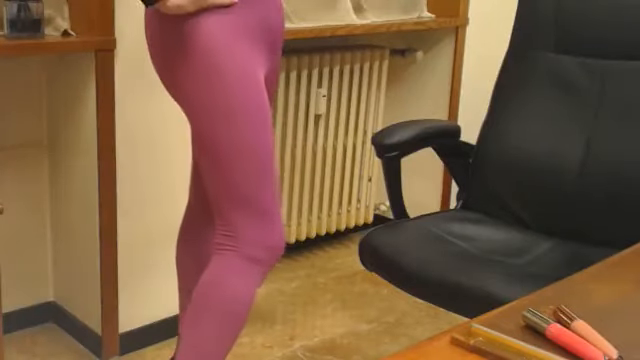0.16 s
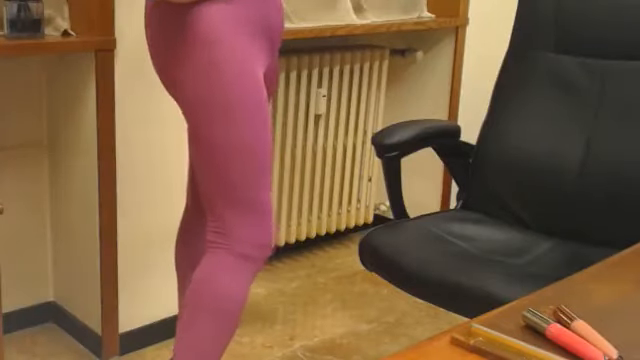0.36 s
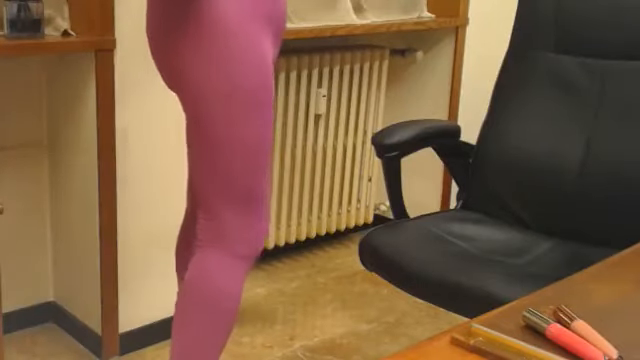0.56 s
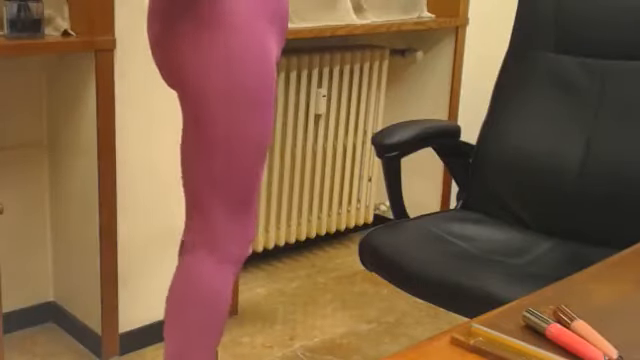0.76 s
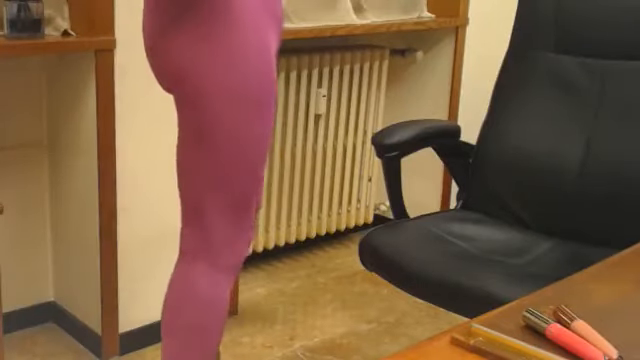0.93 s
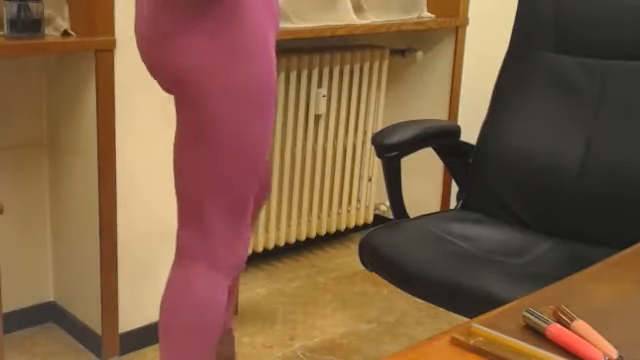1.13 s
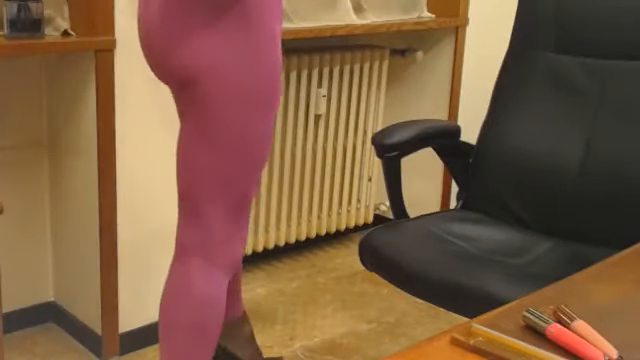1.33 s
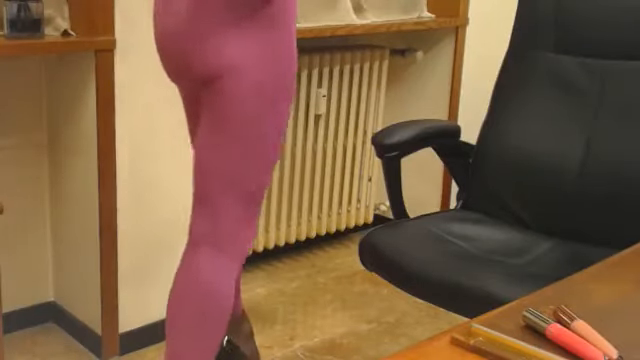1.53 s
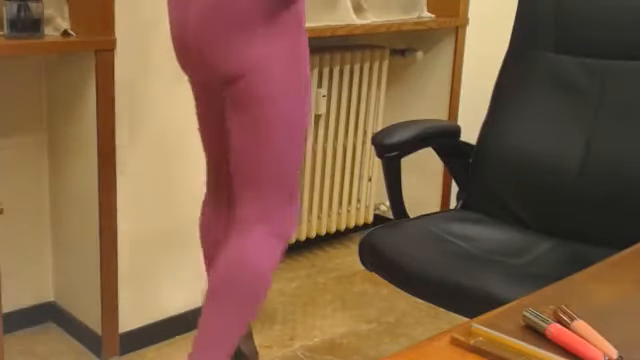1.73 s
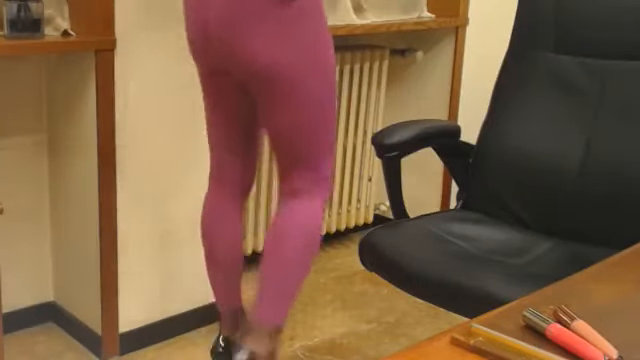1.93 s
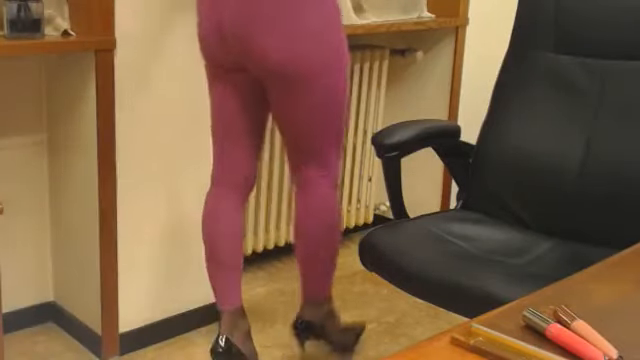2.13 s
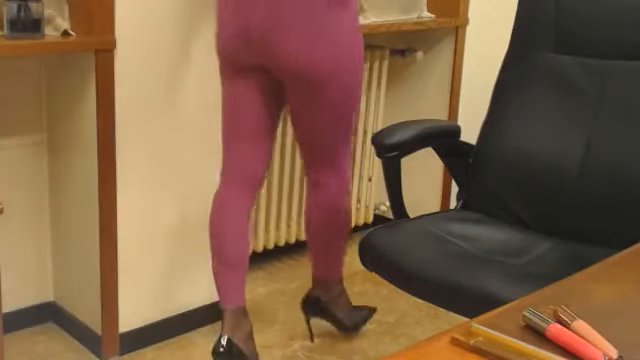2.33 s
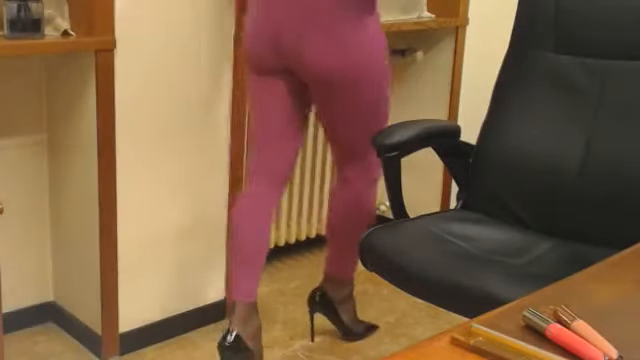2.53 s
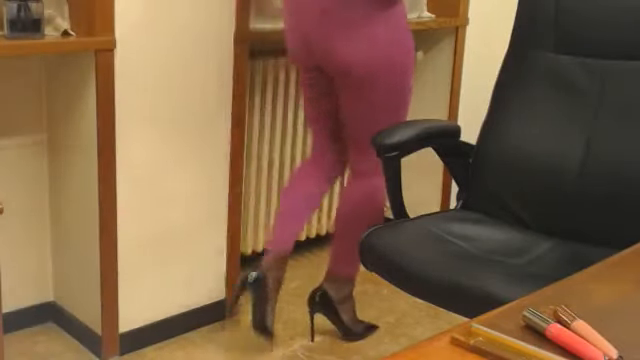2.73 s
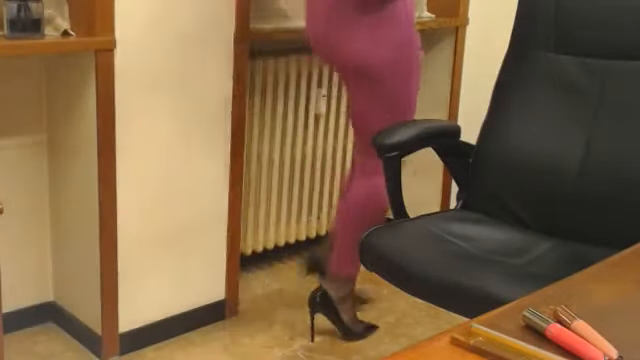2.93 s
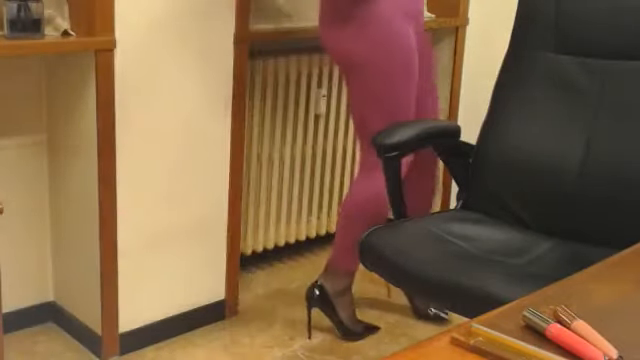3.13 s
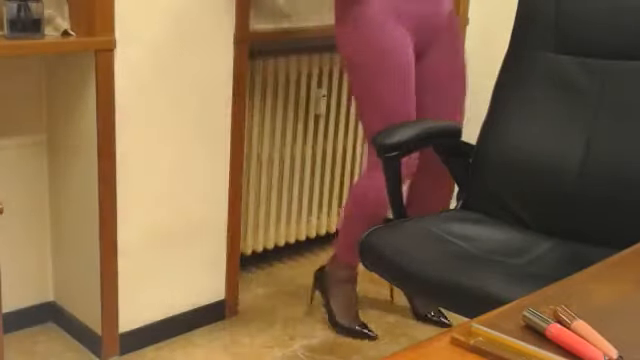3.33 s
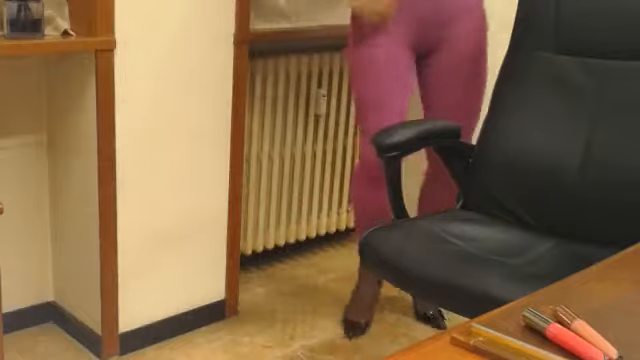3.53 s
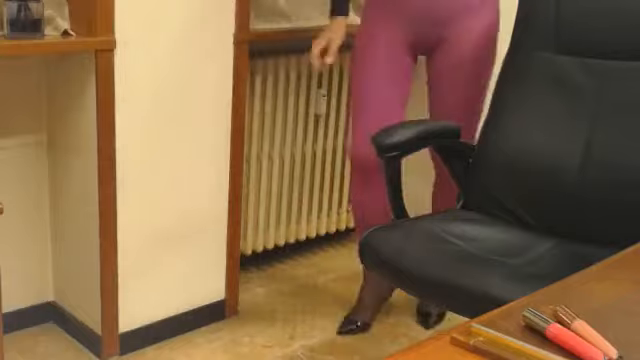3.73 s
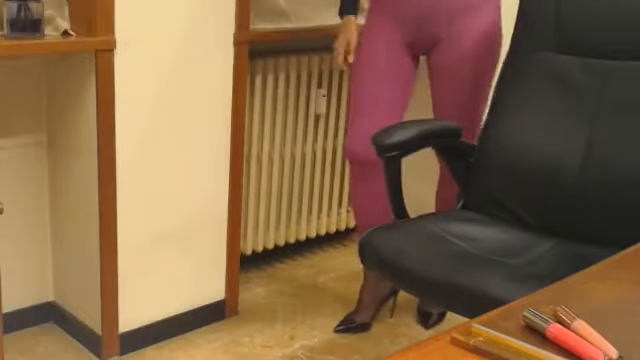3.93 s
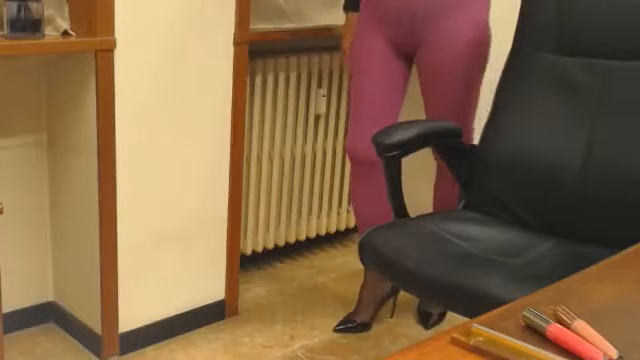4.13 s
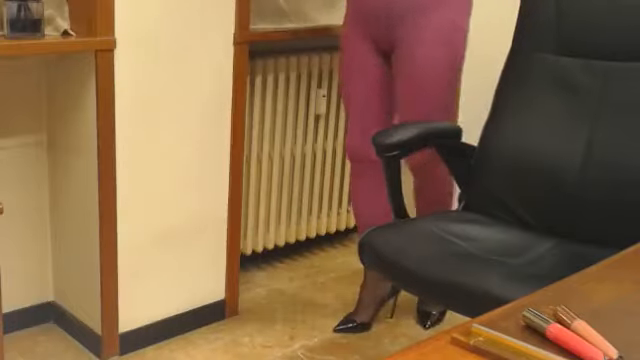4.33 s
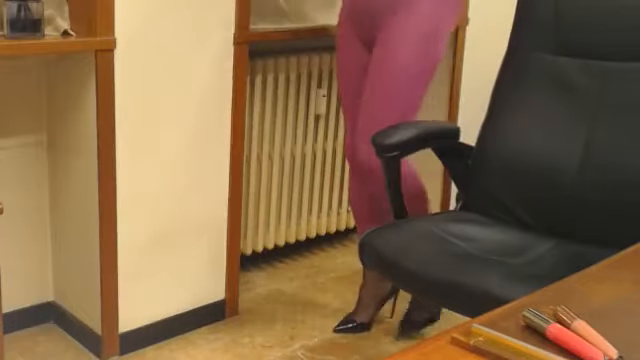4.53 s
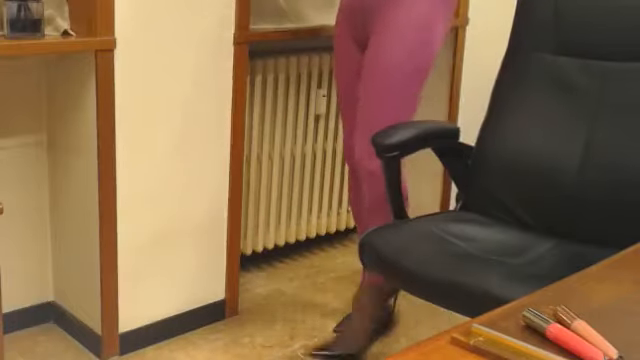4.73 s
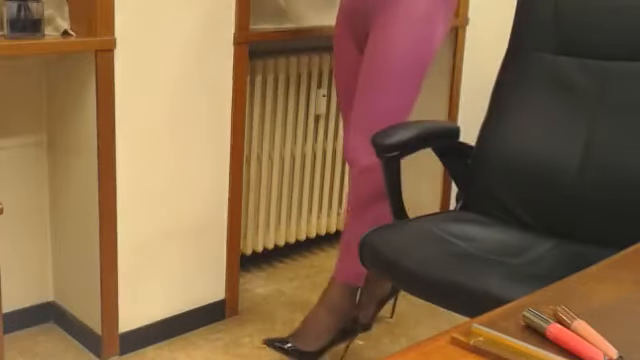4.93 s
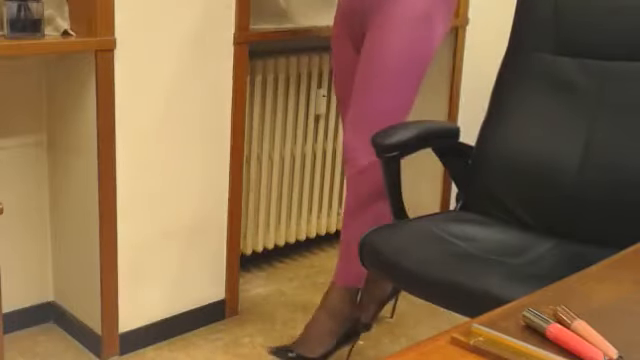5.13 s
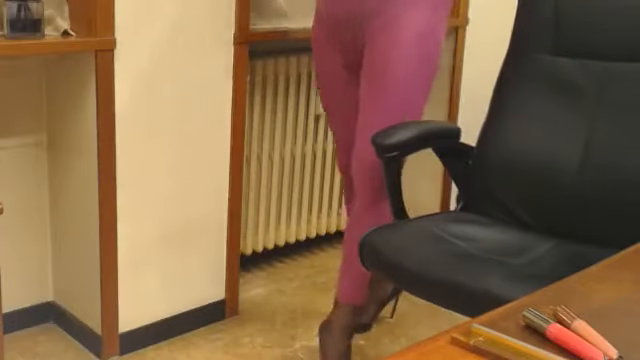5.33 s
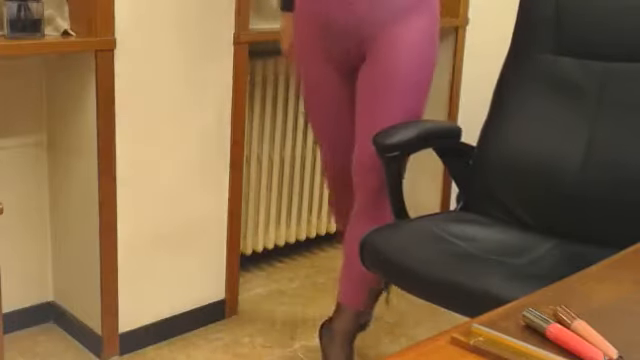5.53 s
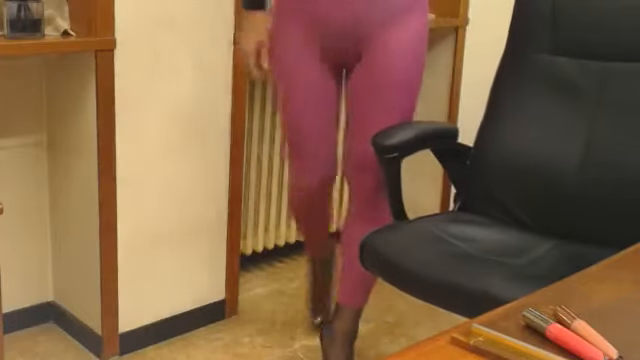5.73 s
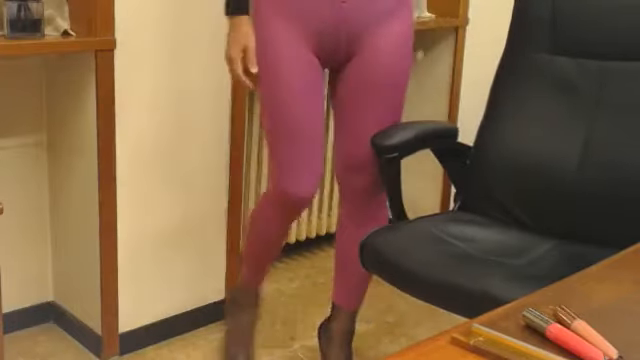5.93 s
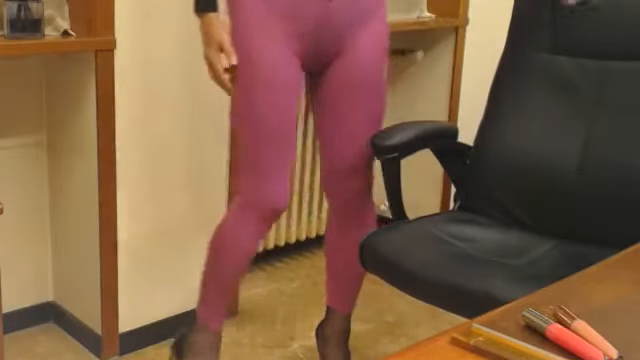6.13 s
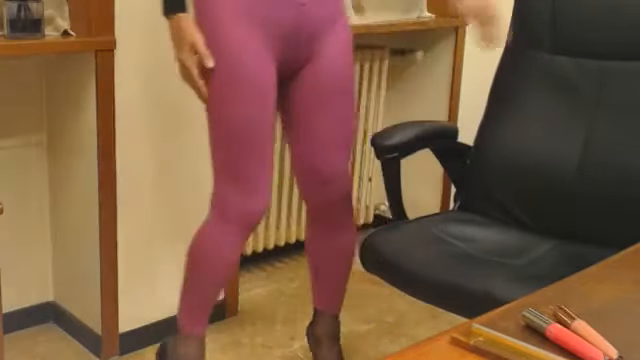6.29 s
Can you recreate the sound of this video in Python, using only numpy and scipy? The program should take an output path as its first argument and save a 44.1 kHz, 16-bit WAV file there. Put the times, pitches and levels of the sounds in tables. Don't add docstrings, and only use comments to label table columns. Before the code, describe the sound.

A faint low ventilation hum and a small cloth rustle open in a small office. High heels then knock firmly on the hard floor, clustering into loud double clacks with gritty sole scrapes. Lighter steps follow, then a pause, one hard stamp, and soft scuffing steps to the end. Heard in stereo from a metre or two away, with short close room reflections.

```python
import sys
import numpy as np
from scipy import signal
from scipy.fft import rfft, irfft
from scipy.io import wavfile
from scipy.ndimage import uniform_filter1d

SR = 44100
rng = np.random.default_rng(int(sys.argv[2]) if len(sys.argv) > 2 else 0)


def invert_db(level):
    return 10 ** (np.asarray(level, dtype=float) / 20)


def output_pcm(signal):
    pcm = np.clip(np.atleast_2d(signal).T, -1, 1) * 32767
    wavfile.write(sys.argv[1], SR, np.round(pcm).astype(np.int16))


N = 280476

# f/Hz, density/dB per Hz
AIR_SPECTRUM = [(22, -2.5), (45, -18.5), (90, -4), (170, -13.5), (340, -9), (600, -13.5), (950, -15),
                (1300, -21), (2200, -28), (4000, -35.5), (7000, -43), (9000, -39.5), (11500, -53),
                (15500, -53)]
# f/Hz, width/Hz, level/dB
DUCT_HUM = [
    (34.4, 25.3, -53),
    (130.5, 12.9, -53.5),
    (208, 85, -55.5),
    (289.4, 39.4, -54.5),
]
# t/s, rumble swell/dB
SWAYS = [
    (.96, 5),
    (1.47, 21),
    (1.84, 6),
    (2.2, 22),
    (2.44, 19.5),
    (3.47, 3.5),
    (4.96, 14),
    (5.38, 5.5),
    (6.13, 9),
    (6.32, 12.5),
]
# t/s, level/dB
MOTION = [(0, -1), (1.25, 0), (1.65, 3.5), (2.05, -4.5), (2.5, 3.5), (2.9, -.5), (3.45, 3), (3.85, 0.5),
          (5.0, -2), (5.4, 0), (6.36, 1.5)]
# peak t/s, rise/s, fall/s, peak level/dB, brightness/dB per range
SWISHES = [(.368, 0.055, 0.062, -54.5, 3.5), (1.592, 0.035, .07, -67, 8), (1.85, .015, 0.13, -59.5, -0.5),
           (2.525, 0.033, 0.13, -66.5, 1), (2.74, .08, 0.035, -71, 6.5), (3.42, 0.38, 0.32, -68, 7.5),
           (3.62, 0.36, 0.47, -66.5, -6.5), (3.95, 0.53, 0.26, -73.5, 10.5), (5.57, .1, 0.063, -71, 5.5),
           (5.77, 0.093, 0.17, -63.5, -1.5), (6.0, .15, .2, -71, 12), (6.12, 0.16, 0.11, -63.5, -7),
           (3.25, .06, 0.087, -84.5, 3.5)]
CLOTH_DB = [-8, -4, 0.5, -8]
# peak t/s, rise/s, fall/s, peak level/dB, brightness/dB per range
SCRAPES = [(.44, 0.037, 0.037, -47.5, 0), (.98, 0.035, 0.069, -64, 10), (1.605, 0.042, 0.12, -46, -1.5),
           (2.088, 0.0087, 0.034, -34, -1), (2.11, .02, 0.13, -49.5, 2), (2.16, 0.053, 0.12, -42, 1.5),
           (2.522, 0.032, 0.044, -43, 3.5), (2.754, .025, .04, -60, -12), (2.55, 0.048, 0.081, -49.5, 4),
           (5.245, 0.013, 0.11, -42, 4), (3.3, 0.014, 0.09, -48.5, -12), (3.79, .02, 0.043, -41.5, -15),
           (3.845, 0.025, .06, -51.5, -3), (4.02, .018, 0.063, -39, -10), (5.475, 0.059, 0.038, -50, -2),
           (5.934, .12, 0.23, -57.5, 6.5), (6.295, .03, 0.2, -48.5, 3.5)]
SOLE_DB = [-1.5, -13, -25.5, -39.5]
# peak t/s, rise/s, fall/s, peak level/dB, brightness/dB per range
RASPS = [(2.09, 0.014, .04, -41, 2), (3.235, 0.033, 0.12, -45.5, 1.5), (3.285, 0.024, 0.03, -65, 0),
         (5.372, 0.035, 0.034, -52, 5), (5.46, .07, 0.098, -49, 4.5), (5.912, .018, .06, -54, 1.5),
         (1.445, 0.011, 0.11, -50.5, -1)]
LEATHER_DB = [-1.5, -3, -19.5, -41]
# t/s, peak level/dB, knock f/Hz, thump/dB re knock, rebound/dB re landing
LANDINGS = [(.429, -35, 545, -31, -.5), (1.432, -18, 656, -3, 5), (1.435, -16.5, 364, -29, -31),
            (1.625, -20, 360, -6.5, -7.5), (2.13, -15.5, 645, -0.5, -16), (2.142, -13, 279, -30, -7),
            (2.397, -15, 402, -11, -1.5), (2.503, -30, 645, -23, 3), (3.273, -17.5, 467, -26, 0),
            (3.781, -21, 423, -33, -0.5), (3.782, -20, 674, -38, -6), (4.009, -28.5, 883, -13, -8),
            (5.24, -11, 514, -9, -2.5), (5.761, -41, 595, -10, -12), (5.902, -36.5, 455, -19, -3),
            (6.109, -43, 418, 1.5, 5), (6.287, -28, 490, -4.5, 6.5)]
# t/s, peak level/dB, knock f/Hz, thump/dB re knock
TOUCHES = [(1.481, -34.5, 405, 4), (1.532, -33.5, 463, -8), (1.643, -24, 277, -9), (1.665, -33, 550, -26),
           (2.089, -26.5, 970, -27), (2.092, -21, 563, -14), (2.163, -12.5, 356, 2), (2.161, -21, 954, -30),
           (2.19, -19, 718, -10), (2.213, -23.5, 287, 1.5), (2.266, -29.5, 308, -2.5),
           (2.423, -22.5, 638, -1), (2.445, -20, 503, -7), (2.52, -24, 806, -14), (3.302, -40, 530, -23),
           (3.322, -30, 550, -23), (3.811, -19, 694, -14), (3.832, -26, 740, -30), (4.044, -46.5, 945, 7.5),
           (3.845, -32, 755, -33), (5.274, -18.5, 380, -24), (5.293, -25.5, 566, -1.5),
           (5.308, -33, 468, -1), (5.374, -38, 380, 3.5), (6.134, -36, 285, -3), (6.306, -24, 537, -32),
           (2.146, -21, 700, -20), (2.551, -45, 880, -23), (1.43, -25, 520, -23), (2.472, -25, 487, -6)]
# t/s, peak level/dB, f/Hz, crack/dB re tick
TICKS = [(1.433, -33, 1700, -12.5), (1.446, -29, 965, -21), (1.592, -42, 834, -10.5), (1.844, -47, 3020, 1),
         (2.078, -34.5, 3780, -23), (2.091, -28.5, 1260, -34.5), (2.090, -31.5, 2420, -29.5),
         (2.132, -41.5, 1810, -5.5), (2.401, -39, 1190, -28), (2.397, -51, 2180, 3),
         (2.523, -53, 3030, -5.5), (2.724, -61.5, 1500, -10.5), (3.218, -37, 2080, -29),
         (5.475, -45, 1260, -26), (3.275, -37, 1480, -24), (3.276, -45, 2720, -19.5),
         (3.782, -40, 1550, -17.5), (4.010, -44, 1740, -7.5), (5.241, -46.5, 1310, -32),
         (5.242, -61.5, 2680, 7), (5.902, -46.5, 1900, -20), (6.106, -63, 1100, -16),
         (6.286, -45.5, 1830, -4.5)]
# lag/s, level/dB
WALL_ECHOES = [
    (.0055, -5),
    (0.023, -29.5),
    (.04, -8.5),
]
# f/Hz, shared power/0..1
LIKENESS = [(60, 1), (300, 0.98), (800, 0.94), (2000, 0.58), (5000, 0.64), (12000, 0.36)]
# t/s, length/s
DROPOUTS = [(.026, .07), (.705, .032), (.993, .045), (1.304, .064), (2.011, .064), (2.753, .041),
            (2.84, .042), (2.97, .047), (3.178, .2), (3.444, .057), (4.162, .071), (4.375, .066),
            (4.609, .046), (4.717, .1), (5.106, .046), (5.64, .047), (5.729, .041), (5.82, .048)]

SWAY_S = 0.11
SWELL_DB, SWELL_ROUND = 21, 1.49
LANDING_TAIL_S, REBOUND_TAIL_S, TOUCH_TAIL_S, TICK_TAIL_S = 0.14, 0.054, 0.057, 0.11
REBOUND_S, REBOUND_HZ = .0125, 530
THUMP_HZ = 203
ROOM_T60_S, ROOM_DB, ROOM_PER_DB = 0.4, -12, -0.1939
TICK_T60_S, TICK_T60_PER_DB = 0.12, -0.13
GATE_SOFT_S, ECHO_SCATTER_DB, ECHO_SCATTER_S = .011, 2.0, .0008
TAIL_N = 8192
PORT_LAG_N = 4


def at_hz(points, hz):
    point_hz, value = np.transpose(points)
    return np.interp(np.log(hz), np.log(point_hz), value)


def rms_one(x):
    return x / np.sqrt(np.mean(x ** 2) + 1e-20)


def drift(rate):
    r = np.exp(-80 * np.pi * rate / SR)
    slow = signal.lfilter([1], [1, -2 * r, r * r], rng.standard_normal(N // 40 + 2002))
    slow = slow[2000:]
    return np.interp(np.arange(N) / 40, np.arange(len(slow)), rms_one(slow))


def resonance(x, hz, width_hz):
    r = np.exp(-np.pi * width_hz / SR)
    zeros = np.array([1, 0, -1]) * (1 - r * r) / 2
    poles = [1, -2 * r * np.cos(2 * np.pi * hz / SR), r * r]
    return signal.lfilter(zeros, poles, x)


def band(x, low_hz, high_hz):
    return signal.sosfilt(signal.butter(2, [low_hz, high_hz], "band", fs=SR, output="sos"), x)


def ports(mid, side):
    size = mid.shape[-1]
    alike = np.clip(at_hz(LIKENESS, np.fft.rfftfreq(size, 1 / SR) + 1), 0, 1)
    shared = np.sqrt(alike) * rfft(mid)
    own = np.sqrt(1 - alike) * rfft(side)
    return irfft(np.array([shared + own, shared - own]), size)


def air():
    t = np.arange(N) / SR
    white = rng.standard_normal((2, 2, N))
    breath_db = .7 * drift(3)
    rumble_db = sum(db * np.clip(1 - np.abs(t - s) / SWAY_S, 0, 1) for s, db in SWAYS) - 2.5
    rustle_db = np.interp(t, *np.transpose(MOTION))
    edges_hz = 22 * 2 ** np.arange(0, 9.7, 1 / 3)
    out = 0
    for k, (low_hz, high_hz) in enumerate(zip(edges_hz, edges_hz[1:])):
        level_db = at_hz(AIR_SPECTRUM, np.sqrt(low_hz * high_hz)) + breath_db + 1.3 * drift(9.2)
        level_db = level_db + rumble_db * (high_hz < 130)
        level_db = level_db + rustle_db * np.clip(np.log2(low_hz / 600) / 2, 0, 1)
        out = out + invert_db(level_db) * band(white[k % 2], low_hz, high_hz)
    out = invert_db(-48.5) * rms_one(out)
    for hz, width_hz, db in DUCT_HUM:
        hum = resonance(rng.standard_normal((2, N)), hz, width_hz)
        hum = resonance(hum, hz, 2 * width_hz)
        out = out + invert_db(db) * rms_one(hum)
    return ports(*out)


def stroke_gains(strokes, colour_db, pivot):
    t = np.arange(N) / SR
    gains = np.zeros((4, N))
    for s, rise_s, fall_s, db, bright_db in strokes:
        away = np.maximum((s - t) / rise_s, (t - s) / fall_s)
        on = away < 1.5
        tilt_db = np.array(colour_db) + bright_db * (np.arange(4) - pivot)
        gains[:, on] += invert_db(tilt_db)[:, None] * invert_db(db - SWELL_DB * away[on] ** SWELL_ROUND)
    return gains


def scuffs():
    sizes = invert_db(np.minimum(rng.exponential(1, (2, N)), 5)) * rng.standard_normal((2, N))
    grains = sizes * (rng.random((2, N)) < 6000 / SR)
    gains = stroke_gains(SWISHES, CLOTH_DB, 2)
    gains += stroke_gains(SCRAPES, SOLE_DB, 0)
    gains += stroke_gains(RASPS, LEATHER_DB, 1)
    ranges_hz = [(750, 1240), (1350, 3320), (3500, 6960), (8000, 11000)]
    out = 0
    for gain, (low_hz, high_hz) in zip(gains, ranges_hz):
        friction = rms_one(band(band(grains, low_hz, high_hz), low_hz, high_hz))
        out = out + gain * invert_db(0.5 * drift(37)) * friction
    return ports(*out)


def reflections(t60_s, room_db, swell_s, gate_s):
    t = np.arange(TAIL_N) / SR
    decay = invert_db(room_db - 60 * t / max(t60_s, .03))
    swarm = rng.standard_normal((2, TAIL_N)) * (1 - np.exp(-t / swell_s)) * decay
    swarm[:, 0] = [1, .3]
    for lag_s, db in WALL_ECHOES:
        wobble = rng.standard_normal(2)
        at = round((lag_s + ECHO_SCATTER_S * wobble[0]) * SR)
        swarm[:, at] += invert_db(db + ECHO_SCATTER_DB * wobble[1]) * np.sign(wobble)
    return swarm / (1 + np.exp(np.clip((t - gate_s) / GATE_SOFT_S, -30, 30)))


def struck(echoes, hz, sharpness):
    body = np.r_[1, np.zeros(2047)]
    for spread in (1.0, 1.6, 2.4):
        body = resonance(body, hz, spread * hz / sharpness)
    body = signal.sosfilt(signal.butter(4, 1.2 * hz, fs=SR, output="sos"), body)
    return signal.fftconvolve(echoes, [body / np.abs(body).max()])[:, :TAIL_N]


def add(out, s, sound):
    at = round(s * SR)
    out[:, at:at + TAIL_N] += ports(*sound)


def knock(out, s, db, hz, thump_db, gate_s):
    room_db = ROOM_DB + ROOM_PER_DB * (db + 25.5) - 19.0
    echoes = reflections(ROOM_T60_S, room_db, 0.0027, gate_s)
    shoe = struck(echoes, hz, 2.33 * (hz / 500) ** 0.5)
    floor = invert_db(thump_db - 2.0) * struck(echoes, THUMP_HZ, 1.78)
    add(out, s, invert_db(db) * (shoe + floor))


def tick(out, s, db, hz, crack_db):
    t60_s = TICK_T60_S * invert_db(TICK_T60_PER_DB * (db + 45))
    echoes = reflections(t60_s, -14.5, 0.00099, TICK_TAIL_S)
    crack = band(echoes, 2800, 8000) + invert_db(-29.5) * band(echoes, 5500, 11000)
    crack[:, :64] += invert_db(-14) * band(echoes[:, :64], 10500, 15500)
    add(out, s, invert_db(db) * (struck(echoes, hz, 2.5) + invert_db(crack_db + 11) * crack))


def steps():
    out = np.zeros((2, N + TAIL_N))
    for s, db, hz, thump_db, rebound_db in LANDINGS:
        knock(out, s, db, hz, thump_db, LANDING_TAIL_S)
        knock(out, s + REBOUND_S, db + rebound_db, REBOUND_HZ, thump_db, REBOUND_TAIL_S)
    for s, db, hz, thump_db in TOUCHES:
        knock(out, s, db, hz, thump_db, TOUCH_TAIL_S)
    for s, db, hz, crack_db in TICKS:
        tick(out, s, db, hz, crack_db)
    return out[:, :N]


def scene():
    left, right = air() + scuffs() + steps()
    late_left = np.r_[np.zeros(PORT_LAG_N), left[:-PORT_LAG_N]]
    return np.array([invert_db(-.6) * late_left, right])


def treble_gaps(x):
    hz, t, spectrum = np.fft.rfftfreq(N, 1 / SR), np.arange(N) / SR, rfft(x)

    def part(low_hz, high_hz):
        return irfft(spectrum * (hz > low_hz) * (hz < high_hz), N)

    dropped = sum(1. * (t > s) * (t < s + length_s) for s, length_s in DROPOUTS)
    dropped = uniform_filter1d(uniform_filter1d(dropped, size=400), size=400)
    dropped = np.maximum(dropped, 0)
    gap = np.clip(0.7 + 0.36 * drift(11), 0, 1)
    upper_gap = np.clip(0.51 + 1.1 * drift(5), 0, 1) * (1 - dropped)
    return x - gap * part(7500, 7950) - dropped * part(7950, 10000) - upper_gap * part(9600, 10100)


def treble_holes(x, share):
    hz, t, cells = signal.stft(x, SR, nperseg=1024)
    chance = uniform_filter1d(rng.standard_normal((len(hz) // 3 + 1, len(t))), size=7)
    silent = chance > np.quantile(chance, 1 - np.clip(share, 0, 1))
    holes = np.repeat(silent, 3, axis=0)[:len(hz)]
    return signal.istft(cells * (1 - holes * (hz > 3400)[:, None]), SR)[1][:, :N]


def band_limit(x):
    return signal.sosfilt(signal.butter(12, 15620, fs=SR, output="sos"), x)


def record(dry):
    mix = treble_holes(treble_gaps(dry), share=.2)
    return band_limit(mix)


dry = scene()
out = record(dry)
output_pcm(out)
```